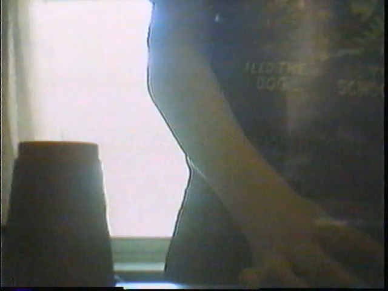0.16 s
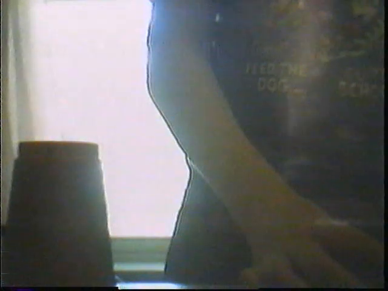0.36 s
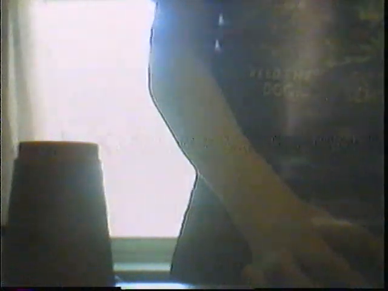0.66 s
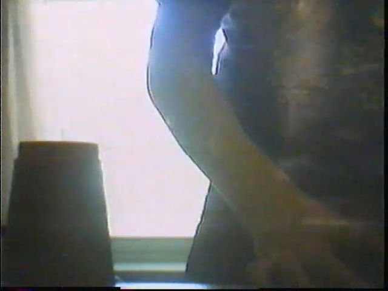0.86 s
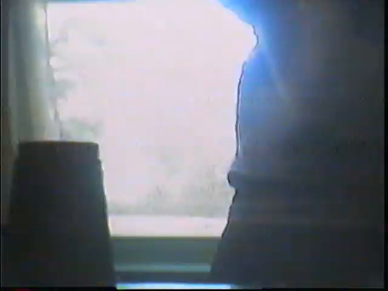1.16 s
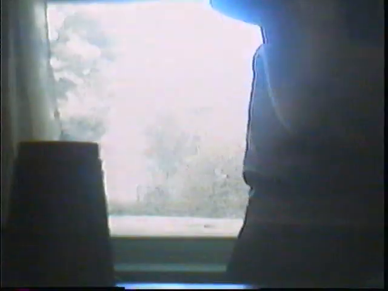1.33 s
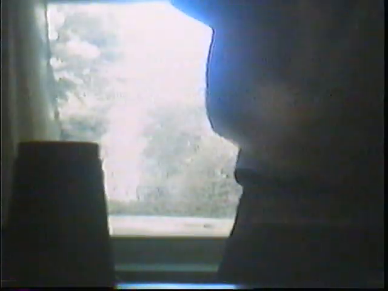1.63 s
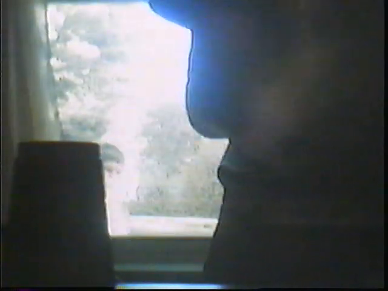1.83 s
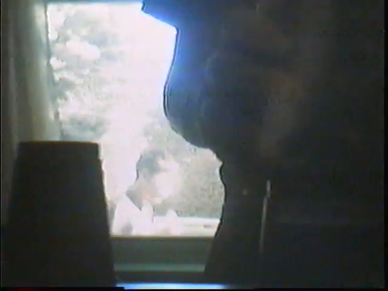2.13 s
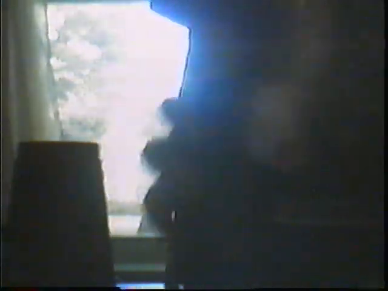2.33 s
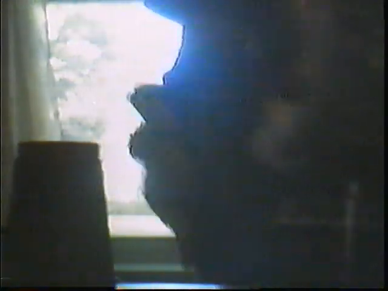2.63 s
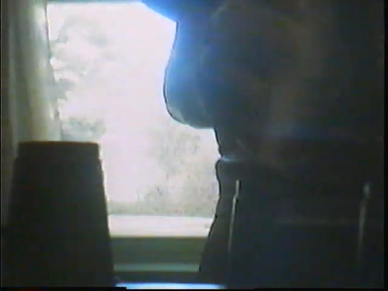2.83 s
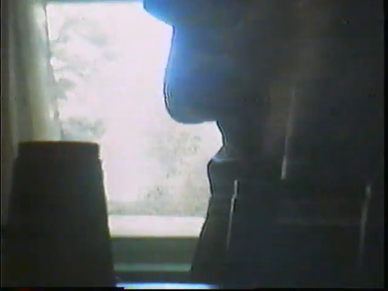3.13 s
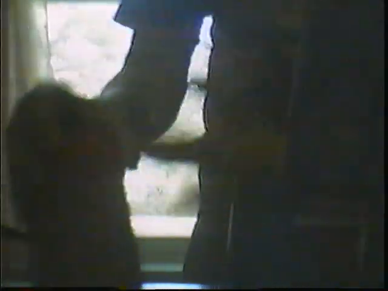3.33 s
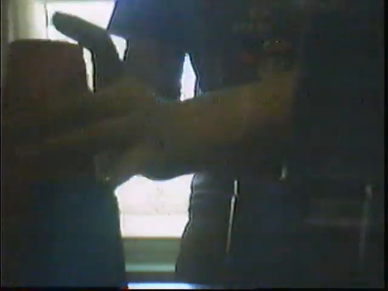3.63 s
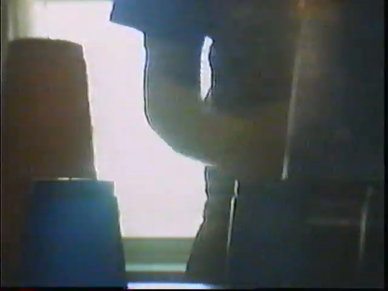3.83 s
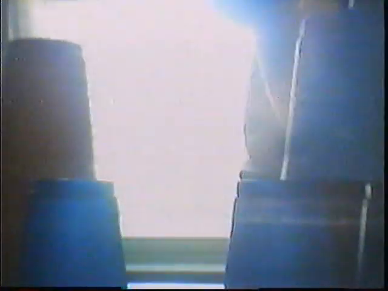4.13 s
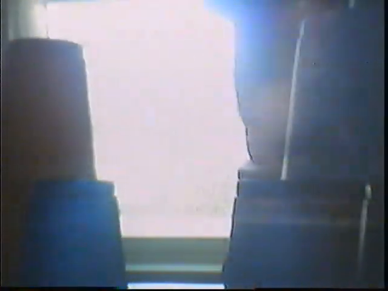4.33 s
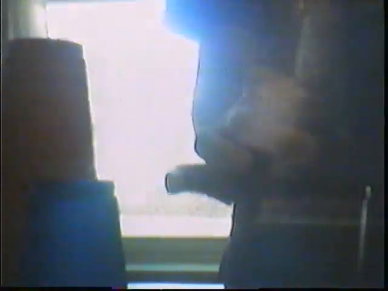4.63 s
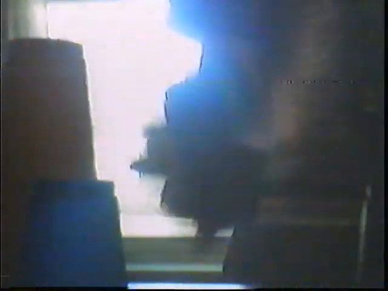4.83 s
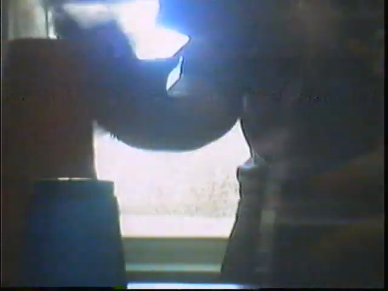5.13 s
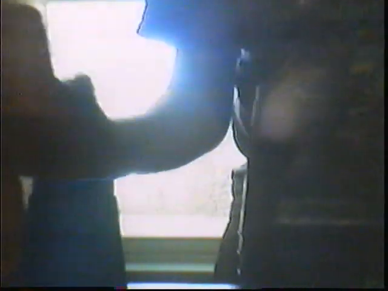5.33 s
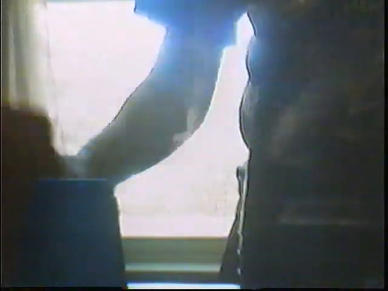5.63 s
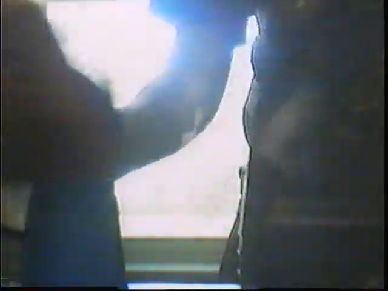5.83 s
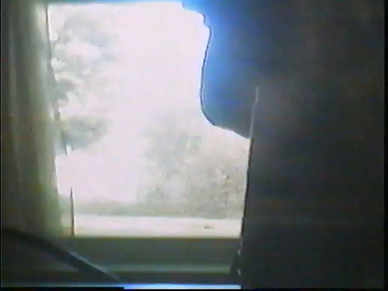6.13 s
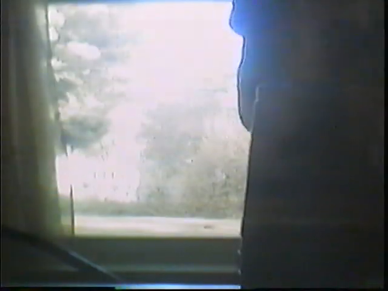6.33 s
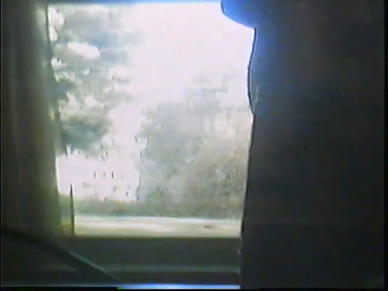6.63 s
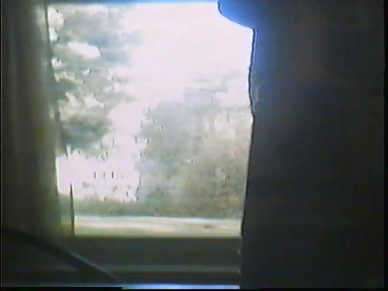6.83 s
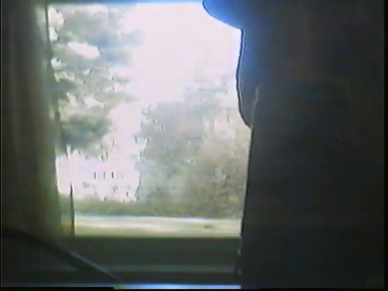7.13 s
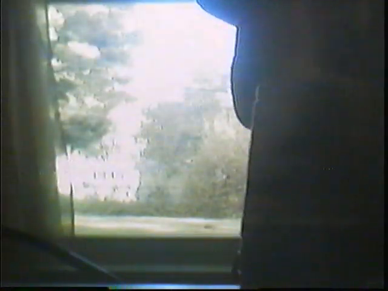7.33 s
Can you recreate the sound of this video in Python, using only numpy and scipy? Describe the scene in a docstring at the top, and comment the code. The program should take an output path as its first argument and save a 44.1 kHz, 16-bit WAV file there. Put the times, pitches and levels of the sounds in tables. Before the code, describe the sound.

Close up in a small kitchen, plastic cups are handled and stacked on a counter. After a second of low hiss comes a loud hollow knock, then faint scrapes and rattles, a run of firm knocks, a short strong scrape, and busy clacks and thuds that thin out to near silence.

```python
"""A small kitchen, the microphone close to a counter where plastic cups are handled and stacked.
Each contact sums damped modes and noise bursts: counter thud, hollow ring, wall clack and rim crack.
Chance stick-slip impulses make the rims scrape, and light knocks rattle through the slides.
Decaying coloured noise answers as the room, over tape hiss, mains hum and the whine of picture circuits."""
import sys
import numpy as np
from scipy import signal
from scipy.fft import rfft, irfft, next_fast_len
from scipy.io import wavfile
from scipy.ndimage import map_coordinates

SR = 44100
rng = np.random.default_rng(int(sys.argv[2]) if len(sys.argv) > 2 else 0)


def master_out(mix):
    """Clip the mix to full scale and print it as 16-bit PCM to the path in sys.argv[1]."""
    frames = np.transpose(np.atleast_2d(mix))
    ceiling = np.clip(frames, -1, 1)
    pcm = np.round(ceiling * 32767).astype(np.int16)
    wavfile.write(sys.argv[1], SR, pcm)


N = 329382

CUP_HZ = 950  # pitch of a single cup


def amp(db):
    """Decibels as an amplitude factor."""
    return 10 ** (np.asarray(db) / 20)


def unit(x):
    """Scaled to rms 1."""
    return x / np.sqrt(np.mean(x ** 2) + 1e-20)


def blow(x):
    """Scaled to the energy of 10 ms at rms 1."""
    return x * np.sqrt(SR / 100 / (np.sum(x ** 2) + 1e-20))


def along(points, hz):
    """Values at hz, from (frequency [Hz], value) points joined on a log frequency axis."""
    point_hz, values = np.transpose(points)
    return np.interp(np.log(hz + 1), np.log(point_hz + 1), values)


def colour(x, spectrum):
    """Minimum-phase filter with the given (frequency [Hz], level [dB]) shape."""
    n = x.shape[-1]
    m = 2 * next_fast_len(n)
    log_gain = np.log(amp(along(spectrum, np.fft.rfftfreq(m, 1 / SR))))
    # folding the cepstrum onto positive times makes the filter causal
    cepstrum = irfft(log_gain, m)
    cepstrum[1:m // 2] *= 2
    cepstrum[m // 2 + 1:] = 0
    response = np.exp(rfft(cepstrum))
    return irfft(rfft(x, m) * response, m)[..., :n]


def wobble(rate):
    """A smooth random curve through rate knots a second."""
    knots = rng.standard_normal(int(N * rate / SR) + 4)
    return map_coordinates(knots, [np.arange(N) * rate / SR])


def tape_floor():
    """Hiss, partly unlike in the two channels, with steady mains hum and picture whine."""
    # tape hiss: (frequency [Hz], relative level [dB])
    hiss_spectrum = [(20, -1), (90, 1.5), (125, -13.5), (180, -3), (330, 1), (550, -5.5), (1000, -14),
                     (2500, -17.5), (5000, -21.5), (8000, -22), (11000, -27), (15500, -18.5)]
    # steady electrical lines: (frequency [Hz], rms level [dB])
    electrical_lines = [(60, -75), (8000, -83), (14734, -88), (15734, -77.5)]
    fizz_spectrum = [(250, -20), (400, 8.0), (1000, -2.0), (3000, -5.0), (15000, -2.5)]
    t = np.arange(N) / SR
    shared_hiss = amp(-67.0) * unit(colour(rng.standard_normal(N), hiss_spectrum))
    channel_fizz = amp(-77) * unit(colour(rng.standard_normal((2, N)), fizz_spectrum))
    whine = sum(amp(db) * np.sqrt(2) * np.sin(2 * np.pi * hz * t) for hz, db in electrical_lines)
    return shared_hiss + channel_fizz + whine


def kitchen(count, build_up):
    """Decaying noise as room answers for count cup places; echoes thicken over build_up seconds."""
    # how long the kitchen rings: (frequency [Hz], t60 [s])
    room_decay = [(120, 0.9), (350, 0.24), (1150, 0.43), (2200, 0.42), (5500, 0.31), (9000, 0.43),
                  (13000, 0)]
    # how strongly the kitchen answers: (frequency [Hz], level [dB])
    room_level = [(120, -20), (300, -2.5), (600, -4.5), (1100, -7), (2000, -9), (3200, -8.5), (4200, -8),
                  (5500, -6.5), (8000, -9.5), (12000, -10)]
    hz, t, noise = signal.stft(rng.standard_normal((count, SR // 2)), SR, nperseg=256)
    t60 = np.maximum(along(room_decay, hz), 0.1)[:, None]  # never shorter than 0.1 s
    shape = amp(-60 * t / t60) * (1 - np.exp(-(t / build_up) ** 2))
    energy = np.mean(shape ** 2, 1) * SR / 2
    shape *= (amp(along(room_level, hz)) / np.sqrt(energy))[:, None]
    return signal.istft(noise * shape, SR, nperseg=256)[1]


def strokes():
    """Gains of rumble and rasp over time: every slide catches quickly, fades as it slows, and stops."""
    # a cup sliding on a cup or on the counter:
    # (start [s], end [s], rumble strength [dB], rasp strength [dB])
    slides = [(1.203, 1.385, -51, -48.5), (1.746, 1.769, -42.5, -43.5), (1.824, 1.991, -52, -51),
              (2.096, 2.28, -47, -47), (2.275, 2.537, -54.5, -53), (2.648, 2.848, -57, -51.5),
              (3.33, 3.582, -58.5, -63), (3.64, 3.691, -28, -32.5), (4.052, 4.121, -46, -40.5),
              (4.63, 4.853, -41, -48), (5.001, 5.225, -45.5, -44.5), (5.261, 5.37, -48, -48.5),
              (5.455, 5.561, -54.5, -45.5), (5.623, 5.781, -50.5, -51), (6.085, 6.261, -67.5, -60),
              (7.112, 7.209, -61.5, -67.5), (7.255, 7.318, -60.5, -55.5)]
    catch_s, slowing_db = 0.0098, 8.5
    t = np.arange(N) / SR
    gains = np.zeros((2, N))
    for start, end, *level_db in slides:
        gate = np.clip(np.minimum(t - start, end - t) / catch_s + 0.5, 0, 1)
        on = gate > 0
        fade = amp(-slowing_db * (t[on] - start) / (end - start))
        gains[:, on] += amp(level_db)[:, None] * gate[on] * fade
    return gains


def slips(rate, spread_db):
    """Stick and slip: tiny catches of uneven size at chance moments; grip limits the largest."""
    catches = (rng.random(N) < rate / SR) * rng.choice([-1, 1], N)
    size_db = spread_db * rng.standard_normal(N)
    return catches * amp(np.minimum(size_db, 1.5 * spread_db))


def scrapes(rumble_gain, rasp_gain):
    """A rim drags along a wall: its slips rasp and make the cup rumble, and the room answers."""
    # low part, the cup body: (frequency [Hz], relative level [dB])
    rumble_spectrum = [(80, -19.5), (180, 6), (350, 7.5), (520, 2.5), (750, 1), (1200, -6), (1500, -8),
                       (2200, -12), (3500, -24.5), (8000, -58)]
    # high part, the rim: (frequency [Hz], relative level [dB])
    rasp_spectrum = [(800, -36), (2000, 0), (3000, 2), (4200, -1), (5500, 3.5), (7700, 0.5), (9000, -9),
                     (10500, -25.5), (15000, -24.5)]
    drag = slips(rate=470, spread_db=1.5)
    rumble = amp(-2.5) * rumble_gain * unit(colour(drag, rumble_spectrum))
    rasp = amp(-5.5) * rasp_gain * unit(colour(drag, rasp_spectrum))
    close = rumble + rasp
    room = kitchen(count=1, build_up=0.012)[0]
    return close + signal.fftconvolve(close, room)[:N]


def rattles(rumble_gain, rasp_gain, count):
    """A sliding cup wobbles and knocks lightly at chance moments; a raspy slide knocks harder."""
    over_rumble_db, spread_db, spread_octaves = -1, 5.5, 0.46
    sliding = np.flatnonzero(rumble_gain)
    # one chance moment in each equal share of the sliding time
    share = (np.arange(count) + rng.random(count)) / count
    at = sliding[(share * len(sliding)).astype(int)]
    size, pitch = rng.standard_normal((count, 2)).T
    level_db = 20 * np.log10(rumble_gain[at]) + over_rumble_db + spread_db * size
    hard_db = 4 + 0.7 * 20 * np.log10(rasp_gain[at] / rumble_gain[at])
    hz = CUP_HZ * 2 ** (spread_octaves * pitch)
    return list(zip(at / SR, level_db, hard_db, hz))


def ticks():
    """A rim flicks past another rim: mostly crack."""
    # flicks: (time [s], strength [dB])
    flicks = [(0.9755, -47.5), (1.2048, -45.5), (2.0416, -52.5), (2.0693, -47), (2.2969, -52),
              (2.7296, -50.5), (4.077, -45), (4.1418, -46), (4.7942, -38), (5.0061, -35), (5.099, -42),
              (5.7903, -50.5)]
    # shares: (counter thud [dB], hollow ring [dB], wall clack [dB], rim crack [dB])
    tick_mix = (-8, -3.5, -6, 0.5)
    return [(s, db + np.array(tick_mix), CUP_HZ) for s, db in flicks]


def bumps():
    """A cup is set down or nudged softly on the counter; a deeper bump is a duller one."""
    # soft landings: (time [s], strength [dB], leading mode [Hz])
    landings = [(1.2112, -27.5, 171.5), (1.4442, -43, 514), (1.4777, -38.5, 676), (1.4953, -33.5, 540),
                (1.5117, -35.5, 950), (2.0981, -36.5, 660), (2.649, -44, 670), (2.7511, -39, 709),
                (2.8048, -37.5, 685), (3.3554, -47.5, 930), (3.4658, -52, 957), (3.6275, -34.5, 760),
                (4.0443, -39.5, 885), (4.0989, -37, 525), (4.872, -34, 200), (5.143, -37, 181),
                (5.5951, -42, 635), (5.951, -30, 200), (6.5441, -32.5, 183), (6.587, -36.5, 638),
                (6.6255, -41.5, 600)]
    # shares: (counter thud [dB], hollow ring [dB], wall clack [dB], rim crack [dB])
    bump_mix = (1.5, -4.5, -21.5, -20.5)
    dulling_db_per_octave = 4
    events = []
    for s, db, hz in landings:
        parts_db = db + np.array(bump_mix, float)
        # all but the thud weaken as the pitch falls
        parts_db[1:] -= dulling_db_per_octave * np.log2(CUP_HZ / hz)
        events.append((s, parts_db, hz))
    return events


def clacks():
    """Nested walls snap together or come free; the bright snap at 6.55 s is a cup set on another surface.
    Hardness adds rim crack."""
    # snaps: (time [s], strength [dB], hardness [dB], leading mode [Hz])
    snaps = [(2.4443, -37.5, -3, 1500), (4.1971, -28, -7, 1635), (4.3075, -38.5, 6.5, 2040),
             (4.3225, -38.5, -6.5, 1446), (4.8557, -35, -0.5, 1795), (4.869, -29.5, 8, 1900),
             (5.063, -33, 0.5, 1930), (5.0722, -35.5, 2.5, 1970), (5.735, -29.5, -5.5, 1950),
             (5.9062, -45.5, 4.5, 1840), (5.946, -30, -6, 1596), (5.9589, -38, 4.5, 1550),
             (6.554, -38, 8.5, 2630), (7.22, -50.5, 1.5, 1490)]
    # shares: (counter thud [dB], hollow ring [dB], wall clack [dB], rim crack [dB])
    clack_mix = (-1, -3, 0.5, -4)
    events = []
    for s, db, hard_db, hz in snaps:
        parts_db = db + np.array(clack_mix, float)
        parts_db[-1] += hard_db
        events.append((s, parts_db, hz))
    return events


def knocks(light_knocks):
    """A cup knocks on a cup and rings hollow; a deeper ring is a heavier stack, which thuds more."""
    # full knocks: (time [s], strength [dB], hardness [dB], leading mode [Hz])
    full_knocks = [(0.9644, -45, -2.5, 1390), (1.2958, -38.5, -3, 880), (1.5226, -17.5, 3, 1015),
                   (1.528, -18, -10.5, 710), (1.532, -21, -9, 1230), (1.8464, -35.5, -0.5, 720),
                   (2.105, -41, 8.5, 675), (2.198, -41, 2, 700), (2.2288, -40, 4.5, 780),
                   (2.4602, -41, 4.5, 1190), (2.76, -36.5, 4.5, 687), (2.8622, -29.5, -4, 706),
                   (2.8721, -29.5, 6, 690), (2.9877, -24, -5, 1090), (3.0621, -27, -6, 960),
                   (3.1154, -27, -5, 1020), (3.124, -19, -4.5, 957), (3.6463, -25, -6.5, 925),
                   (3.6522, -23, -8.5, 974), (4.0569, -24.5, -5.5, 895), (4.269, -37.5, 3.5, 735),
                   (4.6068, -48.5, -5.5, 930), (4.6442, -35.5, -13, 1000), (4.6831, -38.5, -8.5, 1255),
                   (4.705, -29, -2.5, 702), (4.722, -36, 2, 1150), (4.7665, -28, 5.5, 846),
                   (4.9828, -43, 8.5, 820), (5.0377, -39.5, 4, 560), (5.192, -41, -3.5, 697),
                   (5.2651, -43, -17.5, 935), (5.28, -32.5, -14, 904), (5.3001, -38.5, -12, 922),
                   (5.454, -35, -2.5, 944), (5.926, -32, 2.5, 650), (6.553, -34, 0, 765)]
    # shares: (counter thud [dB], hollow ring [dB], wall clack [dB], rim crack [dB])
    knock_mix = (-6.5, -0.5, -11.5, -6.5)
    # what thud, ring, clack and crack each gain with hardness: [dB per dB]
    hardness_gain = (0.84, 0, 0.52, 1)
    thud_db_per_octave = 5.5
    events = []
    for s, db, hard_db, hz in full_knocks + light_knocks:
        parts_db = db + np.array(knock_mix) + hard_db * np.array(hardness_gain)
        parts_db[0] += thud_db_per_octave * np.log2(CUP_HZ / hz)
        events.append((s, parts_db, hz))
    return events


def ring(modes, t, spread_db, detune, attack):
    """Damped modes; every blow meets them with new strengths and slightly other pitches."""
    hz, db, t60 = np.transpose(modes)[:, :, None]
    size, shift, phase = rng.standard_normal((3, len(hz), 1))
    waves = np.sin(2 * np.pi * (hz * (1 + detune * shift) * t + phase))
    decay = amp(db + spread_db * size - 60 * t / t60)
    return blow((decay * waves).sum(0) * (1 - np.exp(-t / attack)))


def burst(spectrum, t, t60, attack):
    """Many close, heavily damped modes: a puff of coloured noise."""
    envelope = amp(-60 * t / t60) * (1 - np.exp(-t / attack))
    return blow(colour(rng.standard_normal(len(t)) * envelope, spectrum))


def flexed(spectrum, count):
    """A rim flexes differently at each contact: chance peaks and dips at count frequencies."""
    flex_db = 3
    hz = np.geomspace(spectrum[0][0], spectrum[-1][0], count)
    return np.transpose([hz, along(spectrum, hz) + flex_db * rng.standard_normal(count)])


def contacts(events):
    """Each contact shakes counter, hollow, wall and rim, and sounds into the room."""
    # the counter under the cups: (frequency [Hz], relative level [dB], t60 [s])
    counter_modes = [(141.8, -4, 0.045), (200, -2.5, 0.057), (248.1, -2.5, 0.01), (336.5, -0.5, 0.059),
                     (410.6, -2, 0.023)]
    # the hollow of a cup: (frequency [Hz], relative level [dB], t60 [s])
    hollow_modes = [(474, -2, 0.026), (606, -7, 0.032), (700, -0.5, .035), (780, -2, 0.033),
                    (917, -1, 0.021), (1090, -4.5, 0.054), (1263, -3, .03)]
    # clack of the wall: (frequency [Hz], relative level [dB])
    wall_spectrum = [(700, -32), (1200, -7.5), (1550, -4), (2000, -3), (2500, -4), (3100, -12), (4200, -13),
                     (8000, -43.5)]
    # crack of the rim: (frequency [Hz], relative level [dB])
    rim_spectrum = [(1500, -26), (3200, -3.5), (4000, 0.5), (5500, 0.5), (7700, -2), (9000, -10.5),
                    (10500, -20), (15000, -29)]
    out, t = np.zeros(N + SR), np.arange(SR // 6) / SR
    rooms = kitchen(count=len(events), build_up=0.006)
    for (s, (*body_db, crack_db), hz), room in zip(events, rooms):
        thud = ring(counter_modes, t, spread_db=1.0, detune=0.066, attack=0.00043)
        hollow = ring(hollow_modes, t, spread_db=7, detune=0.039, attack=0.0016)
        clack = burst(wall_spectrum, t, t60=0.024, attack=0.0003)
        body = np.array([thud, hollow, clack])
        rim = flexed(rim_spectrum, count=28)
        near_crack = burst(rim, t, t60=0.019, attack=0.00027)
        far_crack = blow(colour(1.0 * (t == 0), rim))  # an even click feeds the room
        # grip and point of contact let one mode lead; the higher it is, the sooner it dies
        lead_t60 = 0.021 * (950 / hz) ** 0.62
        lead = ring([(hz, 0, lead_t60)], t, spread_db=1, detune=0.0056, attack=0.45 / hz)
        owner = np.searchsorted([450, 1450], hz)  # it joins counter, hollow or wall by its pitch
        # the near microphone hears mostly that mode; the room gathers all sides more evenly
        near, far = body.copy(), body.copy()
        near[owner] = blow(body[owner] + amp(4.5) * lead)
        far[owner] = blow(body[owner] + amp(2.5) * lead)
        heard = signal.fftconvolve(amp(body_db) @ far + amp(crack_db) * far_crack, room)
        heard[:len(t)] += amp(body_db) @ near + amp(crack_db) * near_crack
        out[round(s * SR):][:len(heard)] += heard
    return out[:N]


def scene():
    """One microphone feeds both channels; they differ slightly, mostly in the treble."""
    # the microphone thins the deep bass: (frequency [Hz], gain [dB])
    bass_response = [(45, -8.5), (95, -5.5), (160, -0.5)]
    difference_spectrum = [(100, -28), (1000, -37.5), (2200, -28), (6000, -17), (12000, -14)]
    floor = tape_floor()
    gains = strokes()
    sliding = scrapes(*gains)
    light_knocks = rattles(*gains, count=36)
    touching = contacts(ticks() + bumps() + clacks() + knocks(light_knocks))
    cups = colour(sliding + touching, bass_response)
    side = colour(cups * unit(wobble(530)), difference_spectrum)
    return np.array([cups + side, cups - side]) + floor


def record(dry):
    """A steep band limit; the converter rests a little off zero."""
    top_hz, offset = 15900, 0.0991  # offset as a fraction of full scale
    m = next_fast_len(N + SR // 2)
    passed = np.fft.rfftfreq(m, 1 / SR) < top_hz
    return irfft(rfft(dry, m) * passed, m)[:, :N] + offset


dry = scene()
out = record(dry)
master_out(out)
```